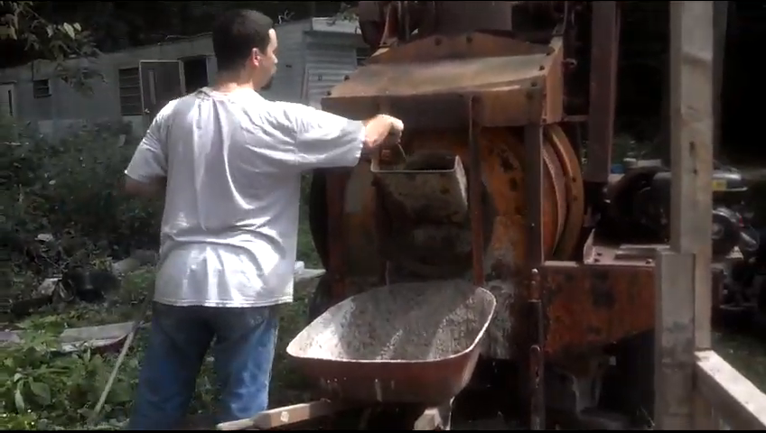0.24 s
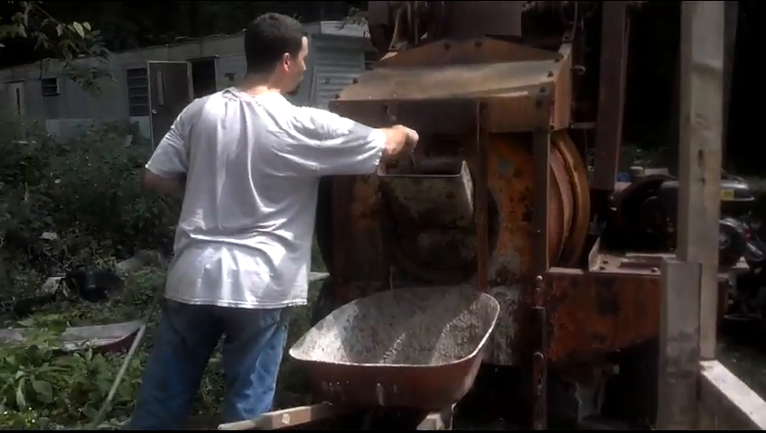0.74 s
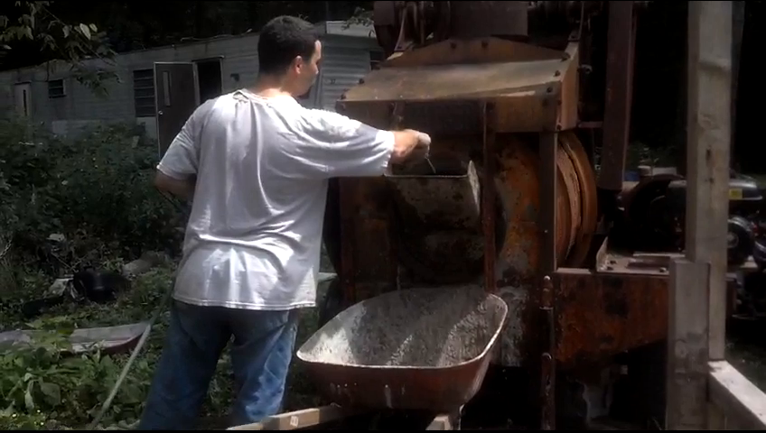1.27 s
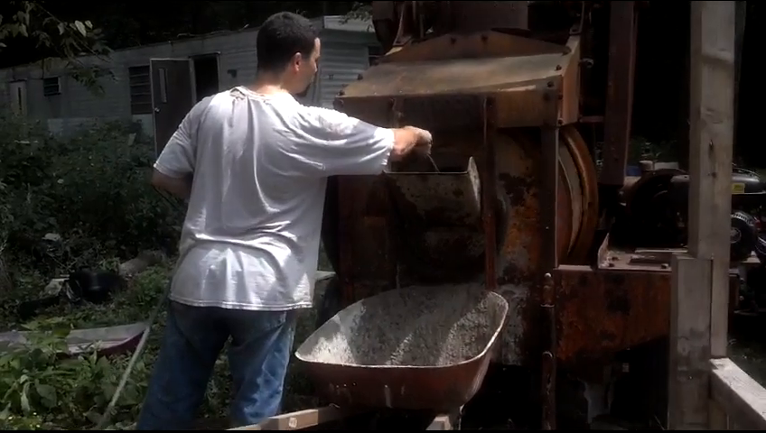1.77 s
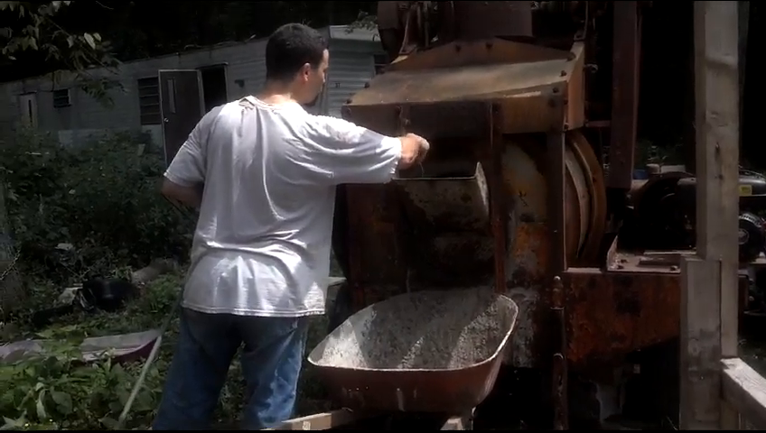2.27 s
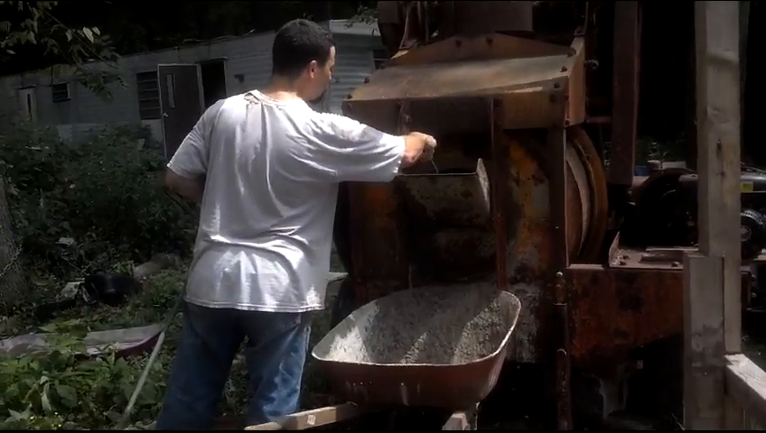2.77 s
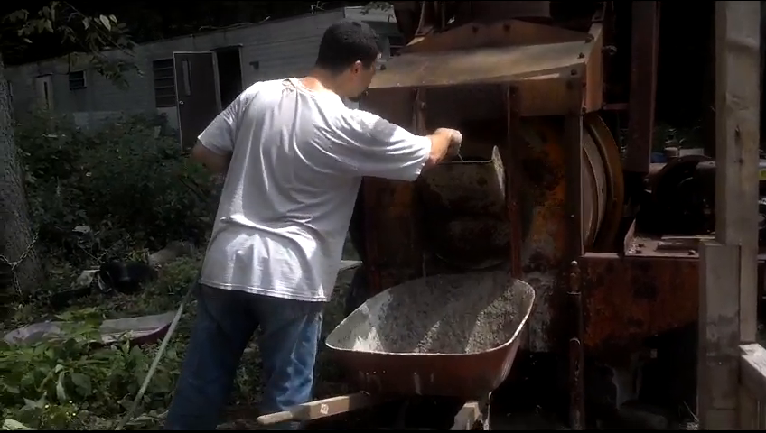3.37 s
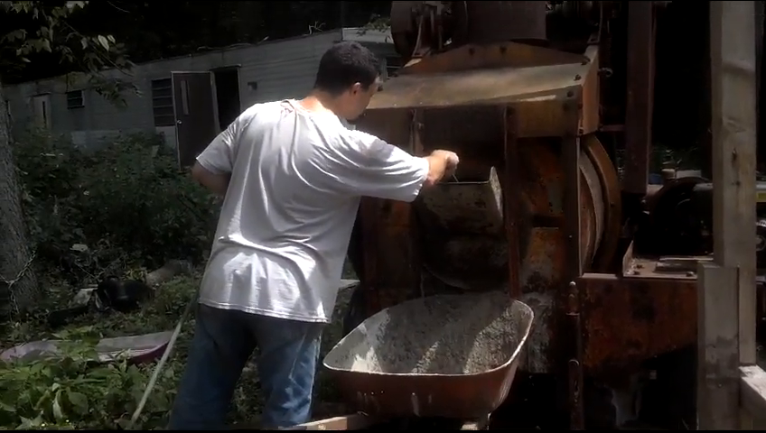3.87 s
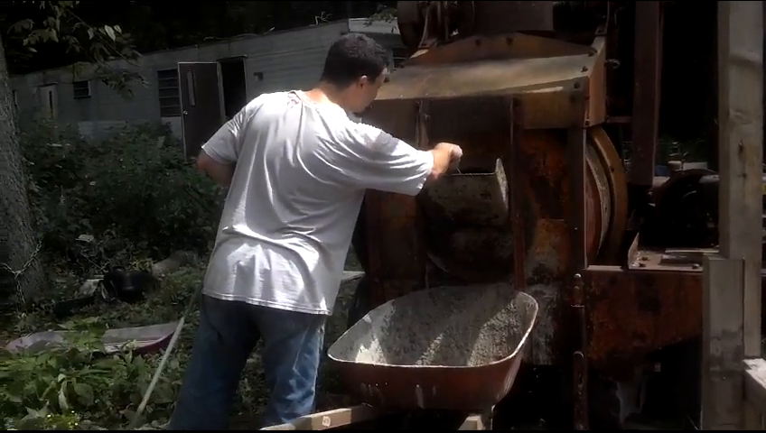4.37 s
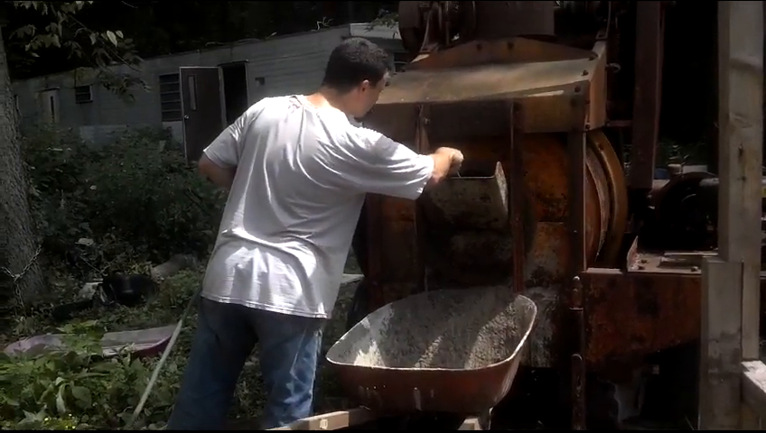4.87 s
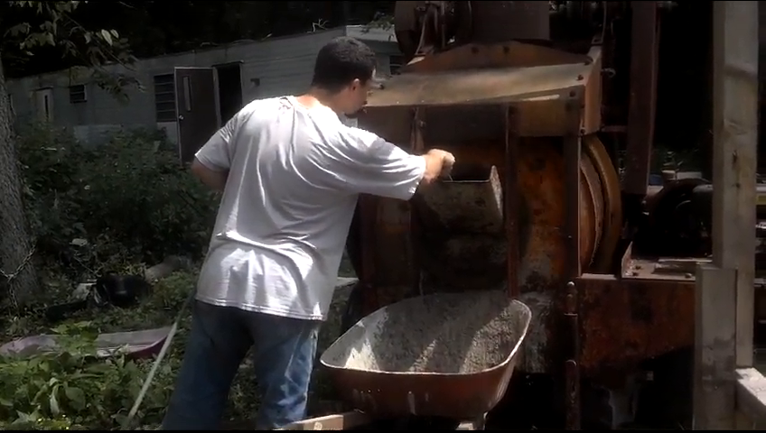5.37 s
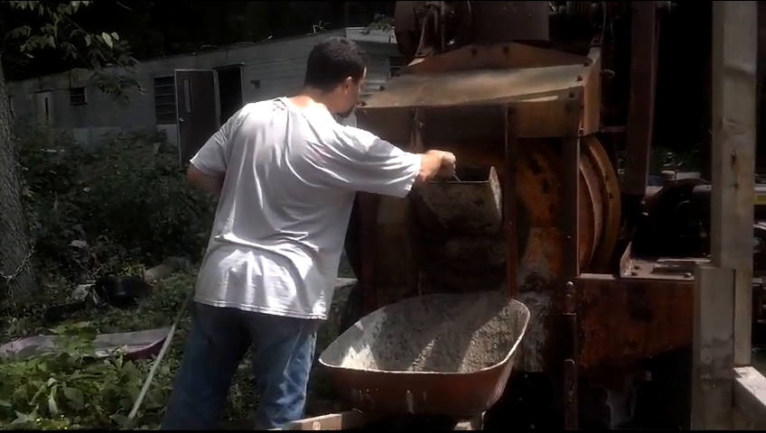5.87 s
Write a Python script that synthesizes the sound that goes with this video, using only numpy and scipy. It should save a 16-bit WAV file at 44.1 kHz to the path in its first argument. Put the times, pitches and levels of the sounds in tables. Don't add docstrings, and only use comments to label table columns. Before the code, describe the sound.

A small engine putters fast and steadily while an old steel cement mixer rumbles, its gravel booming, mortar thudding and stray stones clanking sharply.

```python
import sys
import numpy as np
from scipy import signal
from scipy.fft import rfft, irfft
from scipy.io import wavfile
from scipy.ndimage import uniform_filter1d, map_coordinates

SR = 44100
rng = np.random.default_rng(int(sys.argv[2]) if len(sys.argv) > 2 else 0)


def dump(signal):
    limited = np.clip(np.atleast_2d(signal).T, -1, 1)
    pcm = np.round(limited * 32767).astype(np.int16)
    wavfile.write(sys.argv[1], SR, pcm)


def volts(x):
    e = np.asarray(x, float) / 20
    return 10 ** e


N = 270774
FIRING_HZ = 27.895


def set_level(x, rms_db):
    return x * volts(rms_db) / np.sqrt(np.mean(x ** 2))


def along(table, hz):
    table_hz, value = np.transpose(table)
    return np.interp(np.log(hz + 1), np.log(table_hz + 1), value)


def band(x, hz, width_hz):
    return signal.lfilter(*signal.iirpeak(hz, hz / width_hz, SR), x)


def ring(x, hz, t60_s):
    pole = np.exp(2j * np.pi * hz / SR - np.log(1000) / (t60_s * SR))
    return signal.lfilter([1], [1, -pole], x).imag


def walk(rate_hz):
    hold = int(SR / rate_hz)
    steps = np.repeat(rng.standard_normal(N // hold + 1), hold)
    return 1.35 * uniform_filter1d(uniform_filter1d(steps, hold), hold)[:N]


def bump(centre_s, width_s):
    t = np.arange(N) / SR
    return np.exp(-.5 * ((t - centre_s) / width_s) ** 2)


def pulses(cycles, scatter_db, jitter_s):
    at = np.flatnonzero(np.diff(np.floor(cycles)))
    chance = rng.standard_normal((400, 2))[:len(at)]
    place = np.clip(at + chance[:, 0] * jitter_s * SR, 0, N - 1).astype(int)
    return np.bincount(place, volts(scatter_db * chance[:, 1]), N)


def firing_rate():
    hunt_hz, hunt_period_s, hunt_peak_s, wander_hz = .11, .7, .53, .015
    t = np.arange(N) / SR
    hunt = hunt_hz * np.cos(2 * np.pi * (t - hunt_peak_s) / hunt_period_s)
    return FIRING_HZ + hunt + wander_hz * walk(4)


def exhaust(cycles):
    # multiple of the firing rate, level in dB.
    pipe = [(1, -83), (2, -60), (3, -48), (4, -8.5), (5, -2), (6, -7), (7, -24.5), (8, -5.5), (9, 2),
            (10, -8), (11, -4.5), (12, -5), (13, -24), (14, -25.5)]
    size = 2 ** 15
    order, db = np.transpose(pipe)
    multiple = np.arange(size // 2 + 1) * SR / size / FIRING_HZ
    pipe_db = np.interp(multiple, np.r_[order, order[-1] + 3], np.r_[db, -45])
    cepstrum = irfft(pipe_db * np.log(10) / 20)
    cepstrum[1:size // 2] *= 2
    cepstrum[size // 2 + 1:] = 0
    response = irfft(np.exp(rfft(cepstrum)))
    puffs = pulses(cycles, 0.086, 0.0001)
    return set_level(signal.fftconvolve(puffs, response)[:N], -31.5)


def knock(cycles):
    # mode in Hz, width in Hz, level in dB.
    casing = [(546, 85, -2), (830, 60, -34), (1117, 17, -5.5), (1170, 36, -3.5), (1234, 22, 0),
              (1296, 94, -9), (1269.6, 16.5, 2.5), (1500, 20, -38), (1664, 12, -8.5), (1768, 4.5, 1)]
    turns = 2 * cycles + .43
    rattle = np.exp(-(turns % 1) / 0.55) * rng.standard_normal(N)
    strikes = set_level(pulses(turns, 1.8, .0001), 0)
    blows = (strikes + set_level(rattle, -3.5)) * volts(-1.5 * (np.floor(turns) % 2))
    out = 0
    for k, (hz, width_hz, db) in enumerate(casing):
        out = out + (-1) ** k * volts(db) * band(blows, hz, width_hz)
    return set_level(out, -31.5)


def load_db():
    # time in seconds, surge in dB, hush in dB, hush length in seconds.
    slumps = [(0.136, -3.5, -2.5, 0.053), (0.615, 4, -9, 0.029), (0.871, 5.5, -4, 0.062),
              (1.161, 5, -2, 0.06), (1.522, -1, -3, 0.14), (2.093, 3, -16, 0.014), (2.406, 2, -6, 0.018),
              (2.683, 3, -4, 0.027), (3.54, 1.5, -8, 0.028), (3.834, 1.5, -2, 0.086),
              (4.447, 1.5, -2, 0.062), (4.882, 2.5, -8, 0.0091), (4.952, 4.5, -3.5, 0.19),
              (4.997, -4, -3, 0.012), (5.776, 1.5, -2.5, 0.14), (6.099, 2, -27, 0.013)]
    surge_s, lag_in_hushes = .025, 1.5
    out = np.zeros(N)
    for s, surge_db, hush_db, hush_s in slumps:
        out += surge_db * bump(s, surge_s)
        out += hush_db * bump(s + surge_s + lag_in_hushes * hush_s, hush_s)
    return out


def shell(cycles):
    # mode in Hz, width in Hz, level in dB.
    modes = [(310, 262, -8), (500, 140, -46), (486.3, 44.3, 6), (541.5, 53, 2.5), (617, 97, -5.5),
             (658, 78, -13), (1190, 97, -10.5)]
    turn = np.cos(2 * np.pi * (2 * cycles + .2))
    firing = np.cos(2 * np.pi * (cycles + .05))
    gravel = rng.standard_normal(N) * volts(0.43 * walk(45))
    shake = 1 + .95 * turn + .2 * firing
    boom = 0
    for hz, width_hz, db in modes:
        force = gravel * shake if 400 < hz < 600 else gravel
        wide_hz = 1.34 * width_hz
        boom = boom + volts(db + .8 * walk(12)) * band(band(force, hz, wide_hz), hz, wide_hz)
    return set_level(boom, -26.5) * volts(load_db())


def rush():
    # frequency in Hz, level in dB per Hz.
    spectrum = [(60, -32), (110, -9.5), (200, -7.5), (400, 0.5), (800, -3), (1100, -4.5), (1500, -5),
                (3000, -6.5), (4300, -14.5), (5700, -29.5), (7500, -17), (9000, 3.5), (10500, -58),
                (15000, -19)]
    out, swell, grit = 0, walk(12.0), volts(1.05 * walk(60))
    for hz in 50 * 2 ** np.arange(0, 8.4, 1 / 3):
        hiss = band(band(rng.standard_normal(N), hz, hz / 2.8), hz, hz / 2.8)
        out = out + volts(along(spectrum, hz) + 0.083 * swell + 0.55 * walk(16)) * hiss
    return set_level(out * grit, -28.5)


def soft_booms():
    # start in seconds, peak in dB.
    boom_rows = [(0.144, -14), (0.288, -18), (0.36, -16), (0.398, -28), (0.573, -14), (0.699, -15),
                 (0.753, -15), (0.789, -26), (1.078, -18), (1.134, -16), (1.473, -22), (1.508, -15),
                 (1.58, -28), (2.01, -22), (2.079, -10.5), (2.216, -22), (2.26, -17), (2.333, -17),
                 (2.384, -12), (2.548, -13), (2.586, -22), (2.62, -24), (2.799, -16), (2.871, -11),
                 (2.993, -14.5), (3.052, -14.5), (3.101, -13.5), (3.159, -16.5), (3.241, -13), (3.297, -19),
                 (3.369, -14), (3.44, -11), (3.481, -19), (3.568, -15.5), (3.73, -14), (3.904, -17.5),
                 (4.004, -12), (4.08, -19), (4.115, -11.5), (4.158, -17), (4.267, -25), (4.322, -19),
                 (4.405, -23), (4.446, -18), (4.589, -12), (4.663, -15), (4.733, -15), (4.768, -10.5),
                 (4.837, -15.5), (4.875, -9.5), (4.946, -16), (5.022, -19), (5.789, -17), (5.836, -25),
                 (6.024, -27), (6.093, -12.5)]
    mode_hz, t60_s, push_s, trim_db = 490, .055, .005, -6
    length = 4000
    out = np.zeros(N + length)
    t = np.arange(length) / SR
    shape = (1 - np.exp(-(t / push_s) ** 2)) * np.exp(-np.log(1000) * t / t60_s)
    for (s, db), chance in zip(boom_rows, rng.random((len(boom_rows), 2))):
        hz = mode_hz * (1 + 0.083 * (chance[0] - .5))
        tone = np.sin(2 * np.pi * (hz * t + chance[1]))
        i = int(s * SR)
        out[i:i + length] += volts(db + trim_db) * tone * shape / shape.max()
    return out[:N]


def stones():
    # start in seconds, peak in dB, pitch in Hz, clink in dB, clink pitch in Hz.
    strikes = [(0.673, -32, 1190, -19.5, 3100), (0.879, -12.5, 1180, -27, 3420),
               (1.258, -24, 1250, -40, 3300), (1.2797, -9, 1000, -18, 3100), (1.2835, -14, 1300, -21, 3900),
               (1.289, -14, 1280, -30, 3300), (1.2945, -18, 1200, -21, 3500), (1.651, -28, 1260, -39, 3440),
               (1.852, -21, 1190, -22.5, 3250), (2.223, -21.5, 1120, -23.5, 3320),
               (2.396, -18, 1500, -45, 3500), (2.584, -20, 895, -14.5, 4010), (2.907, -17, 1170, -45, 3480),
               (2.927, -30, 1200, -22, 3150), (3.268, -28, 1200, -21, 3200),
               (3.652, -17.5, 1596, -22.5, 3240), (3.721, -26, 1200, -19.5, 3500),
               (3.921, -30, 1200, -23, 3620), (4.4447, -22, 1180, -40, 3300),
               (4.4572, -19, 1700, -15, 3100), (4.4605, -13, 750, -24, 3520), (4.679, -14, 1300, -39, 3460),
               (4.941, -18, 2010, -14, 3000), (5.0592, -6, 1780, -6, 3430), (5.0625, -5, 780, -16, 5600),
               (5.0632, -10, 1500, -12, 3500), (5.0715, -5, 1190, -20, 3250), (5.079, -15, 1170, -24, 3200),
               (5.4757, -15, 1250, -18, 2500), (5.478, -10, 750, -24, 3200), (5.746, -28, 1900, -19, 3120),
               (6.088, -24, 710, -25, 3100), (6.093, -23.5, 1200, -40, 3150), (6.1018, -21, 714, -15, 3510)]
    # mode in Hz, level in dB, t60 in seconds.
    steel = [(740, 0, 0.05), (877, -2, 0.048), (983, -2, 0.045), (1180, 0, 0.07), (1250, -2, 0.08),
             (1500, -2, 0.06), (1700, -2, 0.035), (1850, -2, 0.035), (2150, -7, 0.03)]
    # share of the clink pitch, level in dB, t60 in seconds.
    clink_modes = [(.72, -12, .012), (.88, -5, .022), (1.0, 0, .022), (1.13, -6, .016), (1.4, -15, .01),
                   (1.65, -15, .01), (2.05, -20, .008)]
    skid_s, skid_db = 0.0039, -17
    spot_db, spot_t60_s = 7, .022
    focus_db = 9
    clink_rise_s, clink_trim_db = .0006, -4.5
    blow_band = signal.butter(2, [450, 8000], "band", fs=SR, output="sos")
    out, length = np.zeros(N), 6000
    t = np.arange(length) / SR
    touch = np.arange(length) == 44
    rise = 1 - np.exp(-(np.clip(t - .001, 0, None) / clink_rise_s) ** 2)
    for (s, db, hz, clink_db, clink_hz), chance in zip(strikes, rng.random((len(strikes), 24))):
        skid = t / skid_s * np.exp(-2 * (t / skid_s) ** 2)
        bounce = 0.1 * np.exp(-.5 * ((t - .013 - 0.0033 * chance[0]) / 0.005) ** 2)
        contact = volts(skid_db) * (skid + bounce) * rng.standard_normal(length) + touch
        dull = volts(spot_db) * ring(contact, hz, spot_t60_s)
        for (mode_hz, mode_db, t60_s), c in zip(steel, chance[2:]):
            gain = volts(mode_db - focus_db * abs(np.log2(mode_hz / hz)))
            dull = dull + gain * np.sign(c - .5) * ring(contact, mode_hz * (.97 + 0.09 * c), t60_s)
        clink = np.zeros(length)
        for share, mode_db, t60_s in clink_modes:
            clink += volts(mode_db) * ring(contact, share * clink_hz, t60_s)
        clink = clink * rise
        hit = volts(db) * dull / abs(dull).max()
        hit = hit + volts(clink_db + clink_trim_db) * clink / abs(clink).max()
        hit = signal.sosfilt(blow_band, hit)
        i = int((s - .001) * SR)
        out[i:i + length] += hit[:N - i]
    return out


def gain_control():
    # time in seconds, drop in dB.
    ducks = [
        (1.29, 2.5),
        (2.66, 2.5),
        (3.96, 2),
        (4.96, 2.5),
        (5.061, 8.5),
        (5.48, 5.5),
    ]
    attack_s, recover_db_per_s = 0.0037, 10
    t = np.arange(N) / SR
    drops_db = []
    for s, db in ducks:
        attack = 1 - np.exp(-np.clip(t - s, 0, None) / attack_s)
        drops_db.append(np.clip(db - recover_db_per_s * (t - s), 0, None) * attack)
    return volts(-np.max(drops_db, axis=0))


def squeals():
    # centre in seconds, length in seconds, level in dB, pitch in Hz.
    whistles = [
        (4.914, .0015, -28, 3080),
        (4.931, .002, -25, 3760),
        (4.936, .003, -32, 3080),
        (4.943, .002, -21, 3080),
        (4.9435, .0018, -21, 3760),
        (4.95, .003, -30, 3700),
        (4.9375, .002, -33, 7900),
        (4.951, .003, -32, 7500),
        (5.757, .006, -35, 3500),
    ]
    grit = set_level(band(rng.standard_normal(N), 3400, 2500), -9)
    t = np.arange(N) / SR
    out = np.zeros(N)
    for s, length_s, db, hz in whistles:
        out += volts(db) * bump(s, length_s) * (np.sin(2 * np.pi * hz * (t - s)) + grit)
    return out


def thumps():
    # time in seconds, level in dB.
    jolts = [
        (5.062, -46),
        (6.13, -50),
    ]
    return sum(volts(db) * bump(s, 0.0036) for s, db in jolts)


def ports(direct, scattered, likeness):
    # frequency in Hz, radians by which left leads.
    lead = [(0, 0), (400, -.18), (1000, 0), (1400, 0), (2250, -2.85), (2440, -3.14), (2660, -3.4),
            (3500, -6.28), (4050, -6.28), (4550, -3.6), (4780, -3.14), (5050, -2.85), (6290, 1.2),
            (8700, -6.4), (11200, -13.3), (13100, -9.4), (15000, -15.4)]
    # frequency in Hz, left minus right in dB.
    balance = [(60, -.5), (200, -2.5), (500, -3.5), (900, -1), (1050, 0), (1350, 0), (1700, 4.5), (2250, 0),
               (2650, 0), (3100, -4), (3600, 0), (5000, 0), (6000, 2), (7500, 4), (9500, 2), (11000, -1)]
    # frequency in Hz, gain in dB.
    mic_response = [(25, -24), (60, -2.5), (90, -2), (110, -0.5), (11500, 2.5), (11900, 3.5), (12300, 2),
                    (14400, 0), (15100, -4), (15250, -7), (15700, -7)]
    hz = np.arange(N // 2 + 1) * SR / N
    like = np.clip(along(likeness, hz), 0, 1)
    mic = volts(along(mic_response, hz))
    turn = np.exp(.5j * np.interp(hz, *np.transpose(lead))) * volts(along(balance, hz) / 2)
    same = np.sqrt((1 + like) / 2) * rfft(direct)
    apart = np.sqrt((1 - like) / 2) * rfft(scattered)
    return irfft([(same + apart) * turn * mic, (same - apart) / turn * mic], N)


def sway(pair):
    spread_s, rate_hz = 6e-6, 3
    lag = spread_s * SR * walk(rate_hz)
    return np.array([map_coordinates(v, [np.arange(N) + side * lag], order=5, mode="mirror")
                     for v, side in zip(pair, (1, -1))])


def hum():
    low = signal.butter(2, 90, fs=SR, output="sos")
    return set_level(signal.sosfilt(low, rng.standard_normal((2, N))), -77.0)


def scene():
    # frequency in Hz, likeness from 0 to 1.
    yard_likeness = [(60, .6), (140, .6), (220, .85), (900, .93), (1050, 1), (1350, 1), (1900, .5),
                     (2280, .983), (2640, .983), (3200, .2), (3750, .85), (4200, .3), (4650, .83),
                     (4900, .815), (5600, .25), (8500, .45), (12000, .25)]
    # frequency in Hz, likeness from 0 to 1.
    hit_likeness = [(60, .9), (900, .96), (1050, 1), (1400, 1), (1900, .6), (2300, .95), (4000, .9),
                    (6000, .5)]
    echo_s, central_db = .43, -11
    cycles = np.cumsum(firing_rate()) / SR - .1
    noise = knock(cycles) + shell(cycles) + rush()
    hits = stones() + soft_booms() + squeals()
    yard = ports(exhaust(cycles) + noise, np.roll(noise, int(echo_s * SR)), yard_likeness)
    blows = ports(hits, np.roll(hits, 150), hit_likeness)
    central = volts(central_db) * band(hits, 3500, 5000)
    yard = yard + blows - central
    return (sway(yard) + hum()) * gain_control() + thumps()


def roll_off(x):
    return signal.sosfilt(signal.butter(12, 15750, fs=SR, output="sos"), x)


def record(dry):
    return roll_off(dry)


dry = scene()
out = record(dry)
dump(out)
```